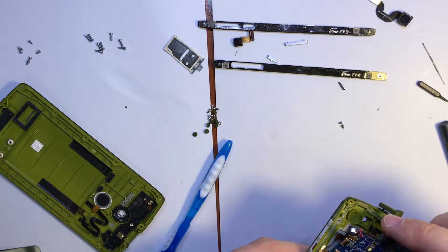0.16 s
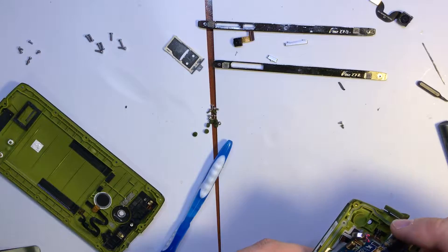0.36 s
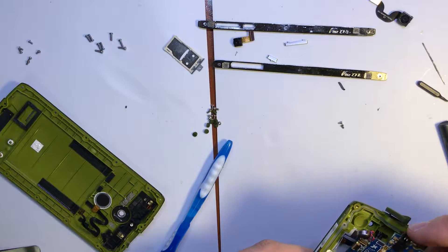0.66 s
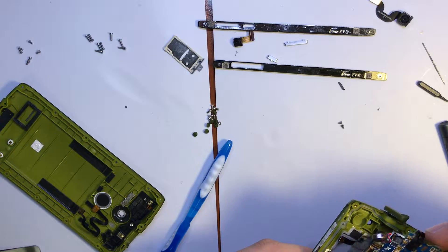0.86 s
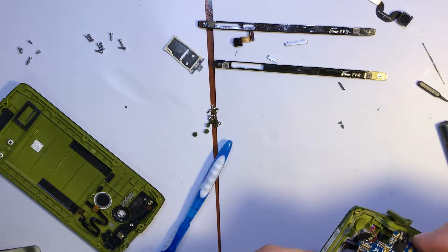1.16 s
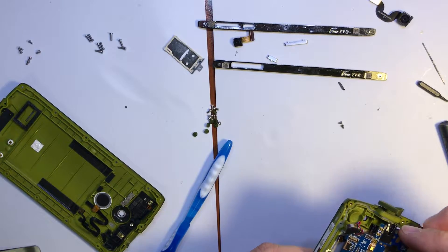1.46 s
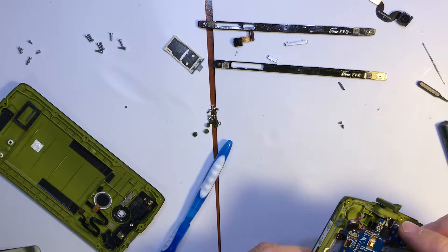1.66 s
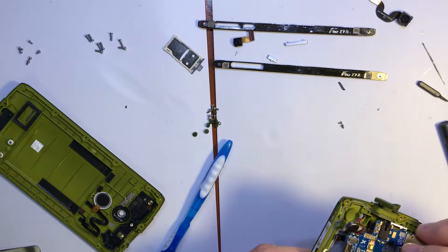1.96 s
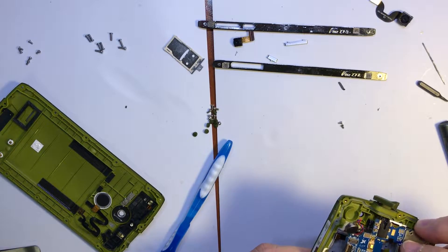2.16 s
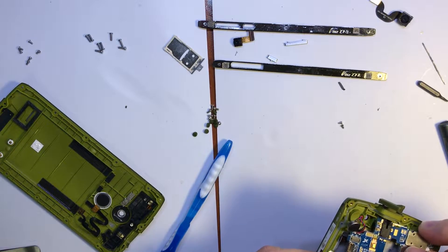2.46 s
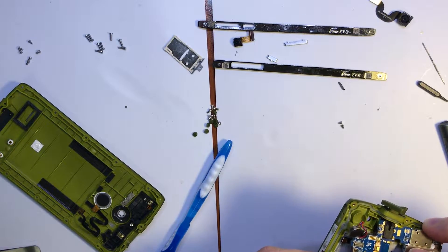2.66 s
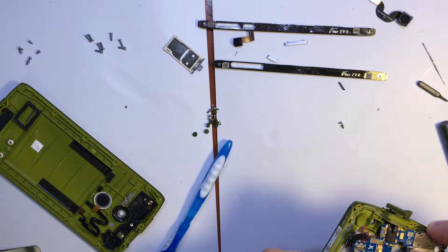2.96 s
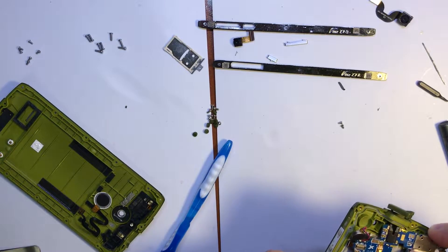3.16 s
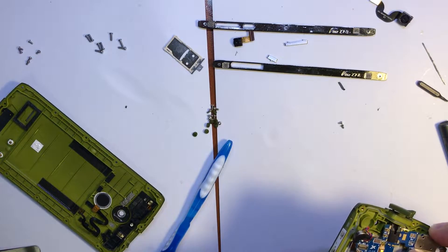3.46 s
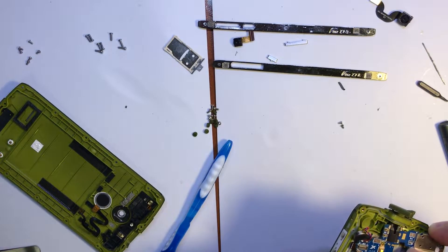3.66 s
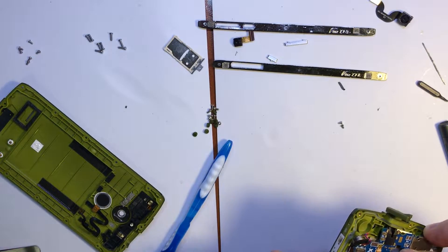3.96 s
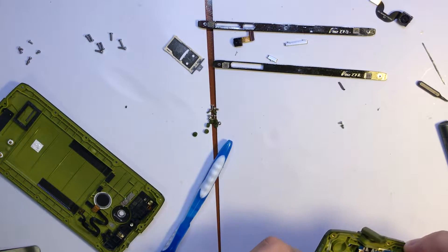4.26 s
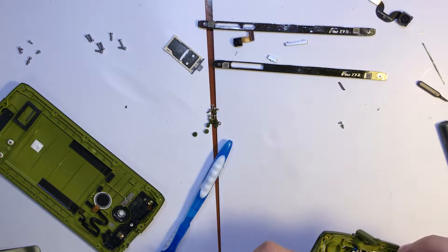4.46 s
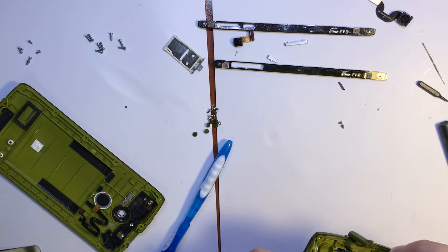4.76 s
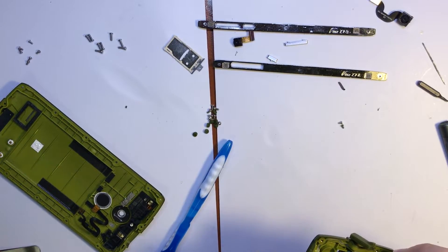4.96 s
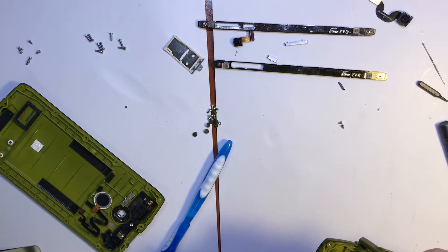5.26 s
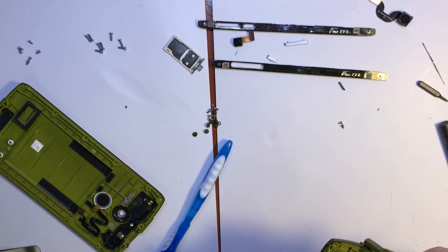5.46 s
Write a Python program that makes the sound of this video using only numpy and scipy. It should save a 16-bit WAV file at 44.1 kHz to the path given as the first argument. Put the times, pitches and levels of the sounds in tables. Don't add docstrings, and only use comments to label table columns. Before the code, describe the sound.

Fine steel tweezers pry at a phone's circuit board with small bright ticks. Around 0.7 seconds a clip snaps loose, by far the loudest event, rattling and scraping briefly over metal. Busy picking follows until about two seconds, then mostly quiet with a tiny screw hop and a soft wrist thump near four. Low hum and airy rumble persist. Close, mono microphone in a small room.

```python
import sys
import numpy as np
from scipy import signal
from scipy.fft import rfft, irfft, next_fast_len
from scipy.io import wavfile
from scipy.ndimage import uniform_filter1d, map_coordinates

SR = 44100
rng = np.random.default_rng(int(sys.argv[2]) if len(sys.argv) > 2 else 0)


def master_out(mix):
    frames = np.transpose(np.atleast_2d(mix))
    ceiling = np.clip(frames, -1, 1)
    pcm = np.round(ceiling * 32767).astype(np.int16)
    wavfile.write(sys.argv[1], SR, pcm)


def natural_amplitude(level_db):
    exponent = np.asarray(level_db, float) / 20
    return 10 ** exponent


N = 247842


def unit(x):
    return x / np.sqrt(np.mean(x ** 2) + 1e-20)


def along(points, hz):
    f, v = np.transpose(points)
    return np.interp(np.log(hz + 1), np.log(f + 1), v)


def curves(rows):
    s, *cols = np.transpose(rows)
    return [np.interp(np.arange(N) / SR, s, c) for c in cols]


def wobble(rate):
    knots = rng.standard_normal(int(N * rate / SR) + 4)
    return map_coordinates(knots, [np.arange(N) * rate / SR])


def held(s, length, db, rise, fall):
    t = np.arange(N) / SR
    return db - rise * np.clip(s - t, 0, None) - fall * np.clip(t - s - length, 0, None)


def filtered(x, response):
    size = next_fast_len(len(x) + 4096)
    return irfft(rfft(x, size) * response(np.fft.rfftfreq(size, 1 / SR)), size)[:len(x)]


def band(x, lo_hz, hi_hz):
    return signal.sosfilt(signal.butter(2, [lo_hz, min(hi_hz, .45 * SR)], "band", fs=SR, output="sos"), x)


def resonant(modes):
    def response(f):
        return sum((-1) ** k * natural_amplitude(db) * 1j * f * w / (c * c - f * f + 1j * f * w)
                   for k, (c, w, db) in enumerate(modes))
    return response


def ringing(modes, t):
    return sum((-1) ** k * natural_amplitude(db - 60 * t / t60) * np.sin(2 * np.pi * hz * t)
               for k, (hz, db, t60) in enumerate(modes))


def rush(spectrum, patchy_db):
    z = signal.stft(rng.standard_normal(N + 512), nperseg=512)[2]
    field = uniform_filter1d(rng.standard_normal(z.shape), size=6, axis=0)
    field = uniform_filter1d(field, size=14, axis=1)
    x = signal.istft(z * natural_amplitude(patchy_db * unit(field)), nperseg=512)[1][:N]
    return unit(filtered(x, lambda hz: natural_amplitude(along(spectrum, hz))))


def tone(hz, db):
    return np.sqrt(2) * natural_amplitude(db) * np.sin(2 * np.pi * np.cumsum(hz) / SR)


def add(track, s, sound):
    track[round(s * SR):][:len(sound)] += sound


# (time [s], level [dB])
TRAFFIC_LEVEL = [(0.0, -64), (0.22, -66.5), (0.48, -66), (0.62, -64.5), (1.45, -67.5), (2.08, -66),
                 (3.29, -67.5), (3.5, -67), (5.26, -65), (5.62, -62.5)]
# (frequency [Hz], level [dB per Hz])
TRAFFIC_COLOUR = [(120, -3.5), (200, -6.5), (264, -7), (302, -7.5), (330, -6.5), (370, -8.5), (487, -14),
                  (618, -8), (774, -12.5), (845, -10), (1250, -12), (1680, -17), (4000, -30), (5200, -51.5),
                  (8800, -120)]
# (frequency [Hz], level [dB per Hz])
HISS_COLOUR = [(2000, -19), (3000, -4), (4200, -1.5), (4850, -4.5), (6000, -0.5), (6500, -5), (6900, -1.5),
               (7700, -11.5), (8600, -6), (10400, -16), (11500, -12.5), (12800, -6.5), (14000, -11),
               (15700, -11.5), (15950, -20), (16500, -30.5)]
# (time [s], length [s], pitch [Hz], glide [Hz per s], level [dB])
WHINES = [
    (0.14, 0.091, 683, 82, -72.5),
    (0.494, 0.04, 700, 22.5, -64.5),
    (3.499, 0.042, 620, 1, -70),
    (4.282, 0.041, 698, 198, -69),
    (5.47, 0.1, 1034, 700, -67.5),
]


def background():
    t = np.arange(N) / SR
    whines = 0
    for s, length, hz, glide, db in WHINES:
        pitch = hz + glide * np.clip(t - s, -.1, length) + 30 * wobble(40)
        whines = whines + tone(pitch, held(s, length, db, 250, 250))
    wash = natural_amplitude(curves(TRAFFIC_LEVEL)[0] + 3.0 + 0.6 * wobble(3)) * rush(TRAFFIC_COLOUR, patchy_db=1.1)
    return whines * wobble(70) + wash + natural_amplitude(-77.5) * rush(HISS_COLOUR, patchy_db=1)


# (frequency [Hz], level [dB], unsteadiness [dB])
HUM = [(51.8, -60, 2), (145.3, -68, 3.5), (158.85, -73.5, 1.5), (193.5, -81.5, -1.5), (198.7, -77, 3),
       (297, -83, 5.5), (807, -81, 0.5), (1245, -83.5, 3), (1969, -90, -0.5)]
WHISTLE = [(11526, -93, .4), (14406, -93, .4)]
# (frequency [Hz], level [dB])
MAINS = (100.03, -52.5)
# (distance [Hz], first dip [s], share)
BEAT = (3.02, .17, .32)


def hum():
    t = np.arange(N) / SR
    lines = 0
    for hz, db, shake in HUM + WHISTLE:
        level = natural_amplitude(db + shake * wobble(6))
        lines = lines + np.sqrt(2) * level * np.sin(2 * np.pi * hz * t + 0.2 * wobble(2.0))
    mains_hz, mains_db = MAINS
    apart, dip, share = BEAT
    turn = 2 * np.pi * mains_hz * t
    motor = share * np.sin(turn - 2 * np.pi * apart * (t - dip))
    return lines + np.sqrt(2) * natural_amplitude(mains_db) * (np.sin(turn) - motor)


# (frequency [Hz], level [dB per Hz])
BOOM = [(20, -33), (35, -1), (45, 12), (53, 18), (60, 12), (70, -8), (90, -51)]
# (time [s], level [dB])
SWELLS = [(0.028, -40.5), (.25, -46), (.5, -45), (.93, -46.5), (1.17, -47), (1.44, -45.5), (1.6, -48),
          (1.76, -55.5), (1.94, -50.5), (2.07, -57), (2.25, -51), (2.38, -54), (2.57, -46), (2.85, -53.5),
          (3.15, -53.5), (3.3, -51.5), (3.47, -48.5), (3.7, -54.5), (4.17, -46), (4.4, -49.5), (4.6, -55.5),
          (4.83, -50.5), (5.08, -49.5), (5.25, -52.5), (5.38, -50), (5.55, -48.5)]
# (frequency [Hz], level [dB per Hz])
AIR = [(60, -4.5), (80, 5.5), (115, 9.5), (132, -7), (158, 1), (180, -10), (215, -29.5), (300, -19),
       (450, -39.5)]


def ventilation():
    boom = rush(BOOM, patchy_db=1.0)
    boom /= np.sqrt(np.abs(uniform_filter1d(boom ** 2, size=3500))) + .2
    pulses = np.max([held(s, 0, db, 110, 110) for s, db in SWELLS], axis=0)
    swell = natural_amplitude(-67) + natural_amplitude(pulses)
    return swell * unit(boom) + natural_amplitude(-60) * rush(AIR, patchy_db=2.5)


# (frequency [Hz], t60 [s])
ROOM = [(500, 0.81), (3000, 0.86), (8000, 0.28), (15000, 0.096)]


def room(x):
    hz, t, z = signal.stft(rng.standard_normal(SR // 2), SR, nperseg=256)
    tail = signal.istft(z * natural_amplitude(-60 * t / along(ROOM, hz)[:, None]), SR, nperseg=256)[1]
    return signal.fftconvolve(np.pad(x, (200, 0)), tail / np.linalg.norm(tail))[:N]


# (time [s], level [dB], frequency [Hz])
THUMPS = [
    (4.075, -33.5, 93.3),
    (4.129, -38.5, 51.6),
    (4.17, -43, 55.4),
]


def thumps():
    out, t = np.zeros(N), np.arange(SR // 5) / SR
    for s, db, hz in THUMPS:
        level = natural_amplitude(db - 60 * t / 0.15) * (1 - np.exp(-t / 0.0024))
        add(out, s, level * np.sin(2 * np.pi * hz * t))
    return out


# (frequency [Hz], width [Hz], level [dB])
KNOCK = [(1390, 550, -2), (1780, 210, 2.5), (2300, 600, 5), (2770, 360, -6.5), (3000, 400.4, -4),
         (3600, 2100, -2.5)]
# (time [s], length [s], level [dB])
GRIPS = [
    (.2, 0.48, -74.5),
    (0.722, 0.052, -61.5),
    (1.0, 0.2, -75.5),
    (2.119, 0.26, -74.5),
    (4.399, 0.16, -89),
]


def grips():
    gate = natural_amplitude(np.max([held(*row, 120, 118) for row in GRIPS], axis=0))
    return gate * unit(filtered(rng.standard_normal(N), resonant(KNOCK)))


# (frequency [Hz], level [dB per Hz])
SKIN = [(1200, -27), (2200, -6), (3200, -8), (4200, -0.5), (5300, -4.5), (6600, 0), (7800, -9.5),
        (9400, -4.5), (10600, -12), (13000, -9.5), (16000, -11)]
# (time [s], length [s], level [dB])
STROKES = [(0, 0.042, -75), (0.522, 0.047, -69), (0.614, .09, -70.5), (0.744, 0.024, -54),
           (0.813, 0.038, -61.5), (0.909, 0.3, -68.5), (1.464, 0.019, -82), (1.65, 0.08, -73.5),
           (1.818, 0.06, -75), (1.977, .02, -74), (2.074, 0.026, -66), (2.148, .1, -79),
           (3.929, .04, -77.5), (4.176, 0.0092, -86), (4.367, 0.034, -78.5), (4.948, 0.11, -78.5),
           (5.172, 0.095, -78), (5.27, 0.11, -75.5), (5.596, .03, -78)]


def rubbing():
    gate = natural_amplitude(np.max([held(*row, 330, 260) for row in STROKES], axis=0))
    return gate * natural_amplitude(1.8 * wobble(86)) * rush(SKIN, patchy_db=-1.5)


# (time [s], level [dB])
TAPS = [(.745, -47), (.759, -41), (.781, -50), (.846, -53), (1.022, -44), (1.032, -42), (1.133, -46.5),
        (1.67, -47.5), (1.937, -49), (5.0427, -46)]


def taps():
    out, t = np.zeros(N), np.arange(SR // 40) / SR
    for s, db in TAPS:
        puff = band(rng.standard_normal(len(t)), 940, 4000)
        level = natural_amplitude(db - 60 * t / 0.023) * (1 - np.exp(-t / 0.00091))
        add(out, s, level * puff / np.abs(puff[:150]).max())
    return out


# (frequency [Hz], level [dB], t60 [s])
SCREW = [(5200, -1.5, .007), (6100, -8, .007), (8140, 0, .007), (10100, -5, .007), (10900, -9, .007),
         (12900, 1, .008), (15550, 3, .009)]
# (time [s], level [dB])
SCREW_HOPS = [
    (3.1446, -69),
    (3.1475, -50.5),
    (3.1508, -60),
    (3.1545, -62),
    (3.158, -65),
    (3.161, -66),
    (3.164, -69),
]


def screw():
    out, t = np.zeros(N), np.arange(SR // 30) / SR
    for s, db in SCREW_HOPS:
        notes = (1 - np.exp(-t / .0004)) * ringing(SCREW, t)
        grit = .35 * natural_amplitude(-60 * t / .006) * band(rng.standard_normal(len(t)), 4500, 17000)
        add(out, s, natural_amplitude(db) * (notes + grit))
    return out


# (time [s], frequency [Hz], level [dB], t60 [s])
PINGS = [(.009, 4140, -57, 0.025), (.014, 4180, -53.5, .025), (.034, 5300, -58, 0.023),
         (.044, 6070, -58, .03), (.044, 12800, -56, .02), (.493, 5350, -53, 0.044),
         (.495, 4620, -54.5, 0.032), (.5265, 5900, -49, 0.03), (.527, 9600, -51, 0.039),
         (.671, 5300, -51, 0.024), (.5225, 6600, -48, .03), (.523, 2270, -58, 0.056),
         (.528, 4150, -53, .03), (.651, 6000, -56, 0.045), (1.021, 4120, -47.5, 0.039),
         (1.031, 4090, -49, .03), (1.096, 9500, -63, 0.081), (1.105, 6600, -63.5, .04),
         (1.19, 4650, -45, 0.024), (1.19, 5540, -49, 0.023), (1.19, 8400, -52.5, .02),
         (1.201, 4650, -59, .025), (1.67, 9550, -52, 0.053), (2.058, 2240, -51.5, 0.053),
         (2.058, 5300, -42, .03), (2.07, 4650, -55, 0.05), (3.684, 8900, -51, 0.012),
         (4.38, 6850, -73, 0.069), (4.38, 9200, -70.5, .08),
         (0.63, 4650, -54, 0.024), (.684, 8200, -51, .02), (1.022, 6640, -55, 0.049),
         (1.0235, 10300, -49, .035), (1.031, 2800, -52.5, 0.036), (1.062, 6800, -52, 0.034),
         (1.133, 9150, -47, .025), (1.136, 2490, -53, .03), (1.146, 5160, -42, 0.027),
         (1.146, 9400, -41, .03), (1.175, 8400, -55, .015), (1.928, 6560, -53, 0.024),
         (1.936, 1960, -53, 0.016), (1.983, 7300, -59, .03), (2.054, 6600, -42, 0.052),
         (2.058, 8500, -45, 0.04), (2.058, 10100, -51, 0.057), (2.085, 8500, -51, 0.024),
         (5.0423, 950, -46, 0.012), (5.0425, 1750, -50, 0.014), (5.0425, 3000, -62, .012),
         (5.0425, 4400, -67, .012), (2.0579, 12300, -36, .015), (2.0578, 13900, -42, .02),
         (2.0548, 12320, -48, .015), (2.058, 4700, -56, .07), (2.058, 5560, -48, .04),
         (1.0635, 9800, -53, .04), (1.032, 1600, -54, .025), (1.133, 11500, -48, .012),
         (1.133, 15300, -46, .012), (1.67, 14000, -43, 0.017), (1.67, 3800, -56, .04),
         (1.652, 11520, -56, 0.014), (1.876, 8500, -58, .02), (3.684, 11800, -57, .012),
         (3.815, 6200, -55, 0.013), (3.816, 9000, -60, .015), (.684, 3600, -55, .02),
         (1.146, 5700, -46, .03), (1.201, 6500, -54, 0.019), (4.168, 5500, -64, 0.026),
         (4.194, 6000, -63, 0.025), (5.0425, 2250, -57, .014), (1.148, 1900, -56, .04),
         (1.023, 13000, -52, .015), (1.063, 12400, -50, .015), (1.026, 2300, -57, .03)]


def pings():
    out, t = np.zeros(N), np.arange(SR // 8) / SR
    uneven = natural_amplitude(3 * wobble(180))
    for k, (s, hz, db, t60) in enumerate(PINGS):
        level = natural_amplitude(db - 60 * t / t60) * (1 - np.exp(-t / 0.00088))
        add(out, s, uneven[k * len(t) // 2:][:len(t)] * level * np.sin(2 * np.pi * hz * t))
    return out


SHIELD_S = .7027
SHIELD = [(2200, -30, .05), (2500, -30, .045), (2880, -36, 0.061), (3345, -32, 0.057), (3710, -26.5, .035),
          (4040, -25, 0.035), (4200, -33, .06), (4690, -29, .045), (4942, -38, 0.05), (5400, -37, .035),
          (6008, -28, .057), (6600, -26.5, 0.051), (7025, -29, .05), (7422, -27, .055)]


def shield():
    out = np.zeros(N)
    add(out, SHIELD_S, ringing(SHIELD, np.arange(SR // 8) / SR))
    return out


def scrape():
    t = np.arange(N) / SR
    fade_t60, lift_s = .6, 0.855
    level = held(SHIELD_S + 0.018, 0, -36.5 - 20.5, 3000, 60 / fade_t60)
    gate = natural_amplitude(level - 2500 * np.clip(t - lift_s, 0, None))
    grit = rng.standard_normal(N) * natural_amplitude(4 * wobble(120))
    notes = signal.fftconvolve(grit, ringing(SHIELD, t[:SR // 8]))[:N]
    return gate * (unit(notes) + natural_amplitude(-5.5) * unit(band(grit, 1202, 9000)))


# (time [s], length [s], frequency [Hz], level [dB])
DRAG = [(.824, 0.0094, 1750, -61.5), (.851, .009, 1770, -65), (.842, .008, 2430, -62),
        (.85, 0.0083, 2430, -58.5), (.825, .005, 4220, -64), (.844, .006, 4200, -59.5),
        (.822, .012, 5500, -67), (.836, .015, 5300, -62), (.828, .016, 6560, -67), (.846, .012, 6560, -62),
        (.756, .012, 4120, -58), (.757, .012, 6560, -59), (.732, 0.0079, 7200, -56)]


def drag():
    out = 0
    for s, length, hz, db in DRAG:
        pitch = hz + 35 * wobble(200)
        out = out + tone(pitch, held(s, length, db, 3000, 1493) - 1.5 + 3 * wobble(300))
    return out


SNAP = [(.70258, -7), (.70264, -3), (.70269, -6), (.70290, -5), (.70301, -5), (.70308, -6), (.70327, -6),
        (.70337, 2), (.70372, -22), (.70520, -9), (.70580, -12), (.70620, -14), (.70650, -10),
        (.70900, -14), (.71020, -14), (.71350, -21), (.71650, -25), (.72000, -26)]
# (frequency [Hz], width [Hz], level [dB])
BOARD = [(620, 70, -14.5), (1150, 220, -10), (1800, 210, -7), (2430, 340, -1), (2764, 400, -3),
         (3460, 130, -2.5), (3710, 260, -1.5), (4000, 800, 1), (4640, 160, -4), (4860, 200, -4.5),
         (5350, 300, -1), (6060, 290, -5), (6400, 300, -2.5), (6600, 300, -1), (7150, 630, -4),
         (7970, 430, -6), (9500, 440, -11.5), (10890, 530, -11.5), (12500, 650, -9.5), (13250, 260, -1),
         (14486, 630, -25), (15500, 700, -12)]


def snap():
    blows, t = np.zeros(N), np.arange(SR // 4) / SR
    for k, (s, db) in enumerate(SNAP):
        blows[round(s * SR)] = (-1) ** k * natural_amplitude(db + 6.5)
    crack = .45 * band(blows, 1500, 12000)
    rattle_t60 = 0.043
    rattle = natural_amplitude(-11.5 - 60 * t / rattle_t60) * (1 - np.exp(-t / 0.0014))
    add(blows, SNAP[0][0], rattle * rng.standard_normal(len(t)))
    return crack + band(filtered(blows, resonant(BOARD)), 370, 13000)


# (frequency [Hz], width [Hz], level [dB])
STEEL = [(4158, 300, -11.5), (4650, 180, 0), (5300, 200, -2), (6500, 490, -1), (8140, 400, -7),
         (8404, 370, -3.5), (9550, 790, -2), (10500, 530, -8), (11960, 1300, -0.5), (13210, 1000, -0.5),
         (14600, 1670, -7.5), (15740, 900, -15.5)]
# (frequency [Hz], t60 [s])
TINE = (6005, 0.043)


def ticks(contacts, twangs):
    out, t = np.zeros(N + SR), np.arange(SR // 12) / SR
    tine_hz, tine_t60 = TINE
    tine = natural_amplitude(-13.0 - 60 * t / tine_t60) * np.sin(2 * np.pi * tine_hz * t)
    fade = natural_amplitude(-60 * t / 0.031)
    for s, db, knock_db, edge_db in contacts:
        clumps = natural_amplitude(1.9 * rng.standard_normal(len(t) // 30 + 1)).repeat(30)[:len(t)]
        grit = rng.standard_normal(len(t)) * clumps
        grit = grit / np.std(grit[:150])
        lost_top = 0.62 * band(grit, 8000, 19000) * (1 - natural_amplitude(-60 * t / .03))
        slide = fade * (grit - lost_top)
        burst = (grit * natural_amplitude(-60 * t / 0.0028) + 0.48 * slide) * (1 - np.exp(-t / 0.00031))
        spot = [(hz, w, level + 2.8 * rng.normal() + edge_db * (hz > 9000)) for hz, w, level in STEEL]
        bend = [(hz, w, level + knock_db + 3.0 + 1.8 * rng.normal()) for hz, w, level in KNOCK]
        steel = band(filtered(burst, resonant(spot)), 4030, 19000)
        board = band(filtered(burst, resonant(bend)), 1000, 5400)
        add(out, s, natural_amplitude(db + 6.5) * (steel + board + natural_amplitude(-10.5) * tine))
    for s, db in twangs:
        add(out, s, natural_amplitude(db + 4.5) * tine)
    return out[:N]


# (time [s], peak level [dB], board knock [dB], bright
# edge [dB])
MORE_CONTACTS = [(.512, -57, -13, -4), (.8435, -52, -10, -10), (1.0565, -56, -14, 2), (1.46, -59.5, -14, -6),
                 (1.6805, -52, -20, -6), (1.7275, -54, -16, -4), (1.875, -53, -16, 0), (1.892, -65, -14, 0),
                 (1.9205, -67, -25, 2), (1.9855, -54, -16, -1), (2.0598, -40, -14, 1), (2.0525, -56, -20, 2),
                 (2.076, -54, -16, 0), (2.096, -58, -16, -3)]


def more_ticks():
    return ticks(MORE_CONTACTS, [])


CONTACTS = [(.009, -55, -16, -12), (.035, -49, -25, -19), (.039, -50, -26, -3), (.4923, -40.5, -16, -10),
            (.5222, -43.5, -10, -8), (.5264, -38, -16, -10), (.6413, -50, -5, -9), (.651, -47, -10, -17),
            (.6706, -44, -17, -12), (.6828, -42, -18, -9), (.843, -49, -4, -12), (.8518, -51, -3, -18),
            (1.0197, -45, -8, -6), (1.023, -45, -3, 4), (1.0313, -45, 1, -2), (1.0546, -57, -9, 5),
            (1.0623, -41.5, -10, 4), (1.0954, -52, -9, -8), (1.105, -52, -13, -1), (1.1326, -39, -3, 6),
            (1.146, -30, -16, 0), (1.1743, -45, -13, -6), (1.1893, -32, -24, -7), (1.2002, -39, -19, -5),
            (1.652, -46, -14.5, -5), (1.6697, -32.5, -22, -8), (1.71, -51, -21, -12), (1.7178, -44, -18, -3),
           (1.731, -46, -14, -8), (1.855, -49, -12, -15), (1.871, -51, -11.5, -3), (1.885, -56, -8, -16.5),
           (1.927, -54, -7, -26), (1.936, -58, 4, -16), (1.9732, -53, -17, -4), (1.98, -50.5, -11, 0),
           (2.0542, -32, -31, -5), (2.0575, -29.5, -21, 2), (2.0625, -43, -22, 0), (2.069, -45, -16, -2),
           (2.0845, -39.5, -25, -4), (3.684, -54.5, -6.5, 0), (3.815, -50.5, -17, -7.5),
           (4.1604, -54, -15, -7), (4.168, -53, -10, -9), (4.194, -49.5, -12, -12), (4.367, -63, -10, 2),
           (4.3914, -54.5, -10, -0.5), (5.0121, -65, -12.5, 2), (5.045, -60, -3, 1)]
# (time [s], level [dB])
TWANGS = [(0.6422, -56.5), (.843, -56), (1.0954, -56), (1.133, -43), (1.146, -33.5), (1.67, -43),
          (1.711, -50), (1.731, -48), (1.874, -46), (1.928, -39.5), (1.9732, -53), (1.983, -50),
          (2.056, -39), (2.0845, -43), (5.052, -62)]


def tweezers():
    return ticks(CONTACTS, TWANGS)


def scene():
    near = tweezers() + pings() + snap() + shield() + taps()
    surroundings = background() + hum() + ventilation()
    hands = thumps() + grips() + rubbing()
    small_parts = screw() + scrape() + drag() + more_ticks()
    return (surroundings + hands + small_parts + near + natural_amplitude(-28) * room(near))[None]


def top_cut(x):
    return signal.sosfilt(signal.butter(12, 16870, fs=SR, output="sos"), x)


# (frequency [Hz], level [dB])
EDGE = [(15500, 0), (15750, -2), (15900, -15), (16400, -27), (16800, -42), (17000, -70)]


def record(dry):
    mix = filtered(dry[0], lambda hz: natural_amplitude(along([(0, 0.0036)] + EDGE, hz)))[None]
    return top_cut(mix)


dry = scene()
out = record(dry)
master_out(out)
```